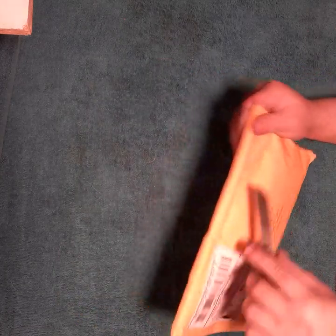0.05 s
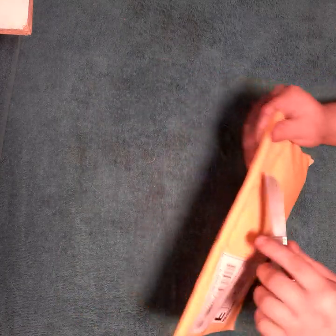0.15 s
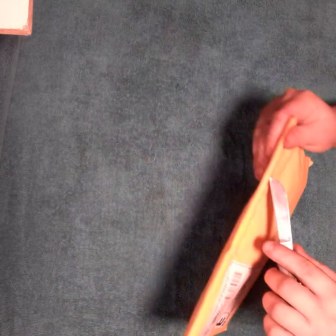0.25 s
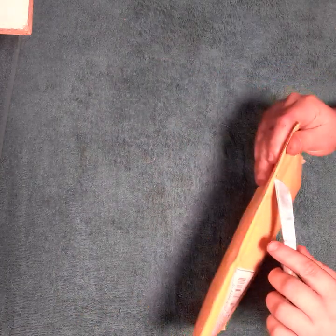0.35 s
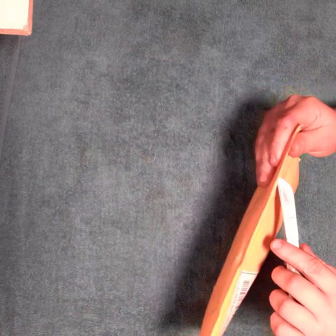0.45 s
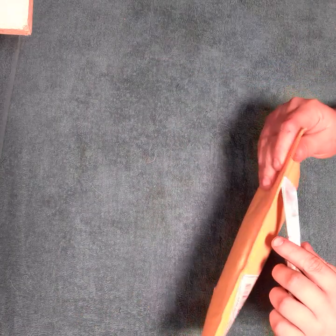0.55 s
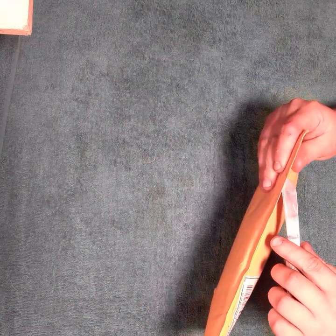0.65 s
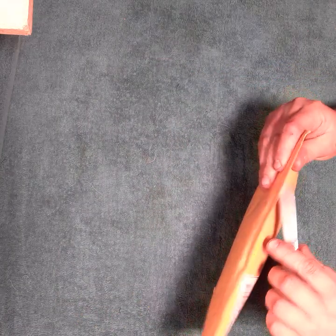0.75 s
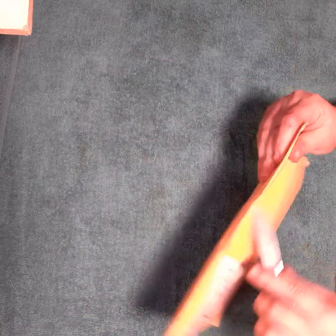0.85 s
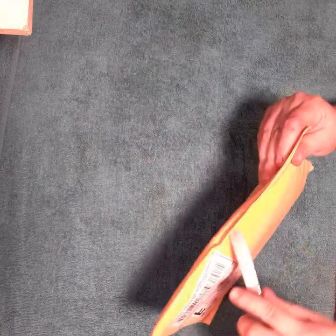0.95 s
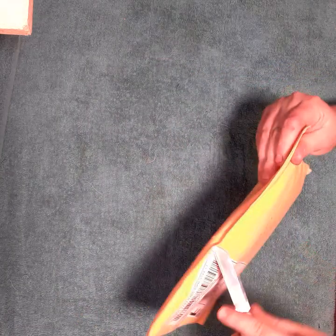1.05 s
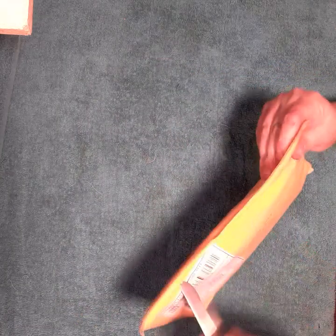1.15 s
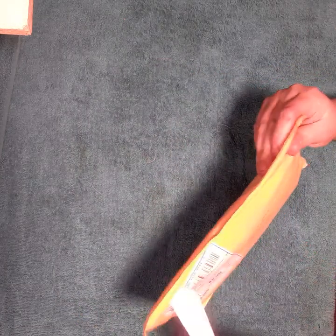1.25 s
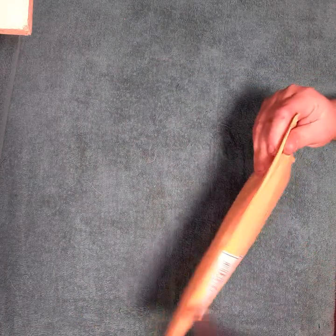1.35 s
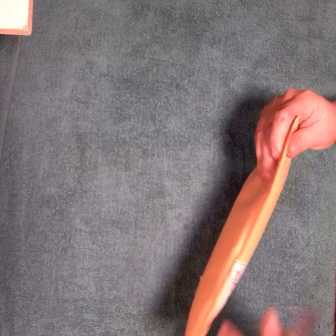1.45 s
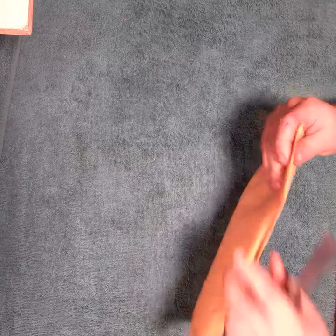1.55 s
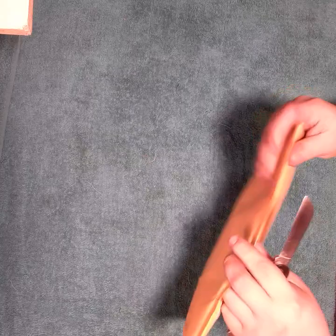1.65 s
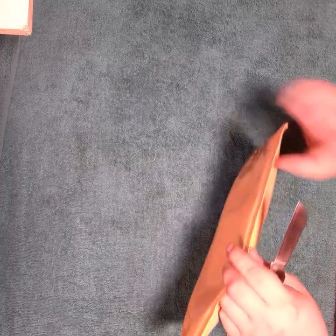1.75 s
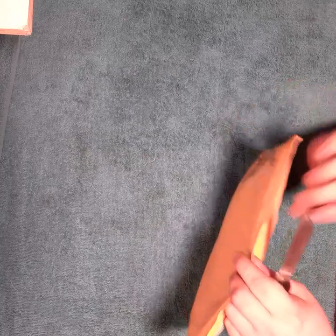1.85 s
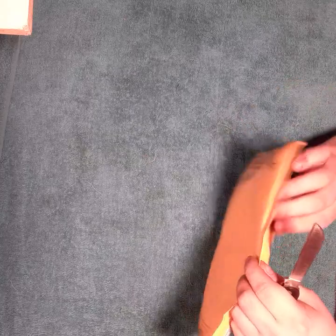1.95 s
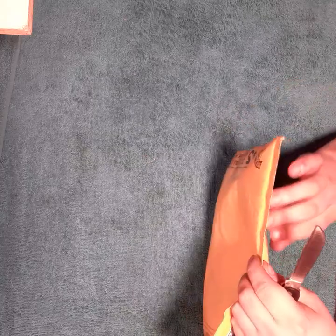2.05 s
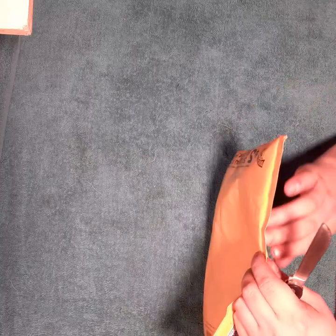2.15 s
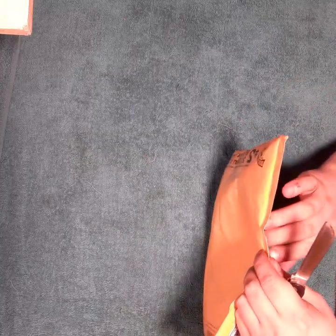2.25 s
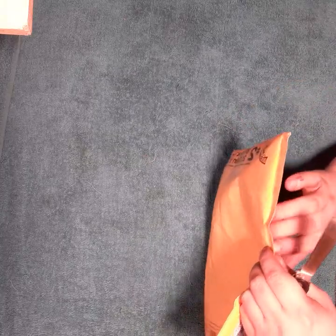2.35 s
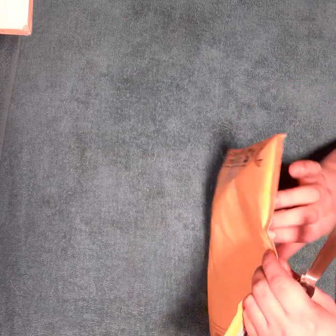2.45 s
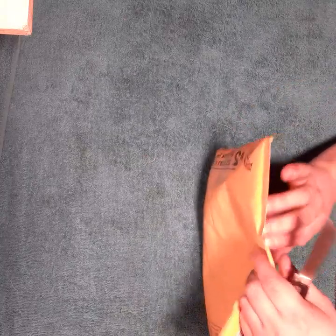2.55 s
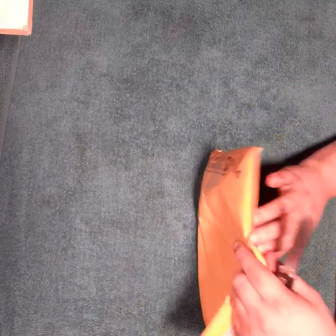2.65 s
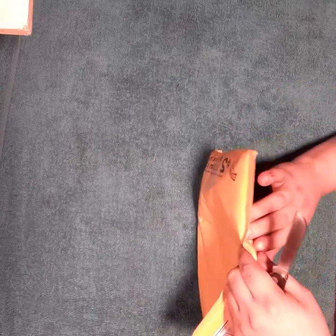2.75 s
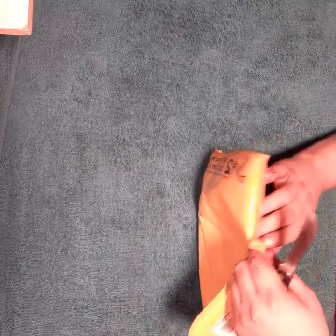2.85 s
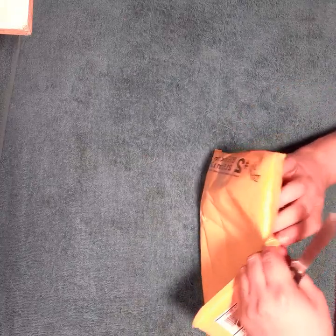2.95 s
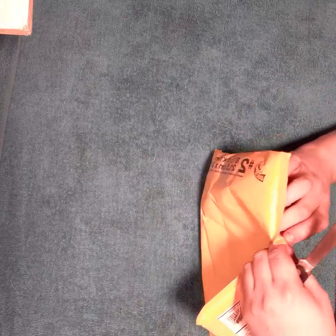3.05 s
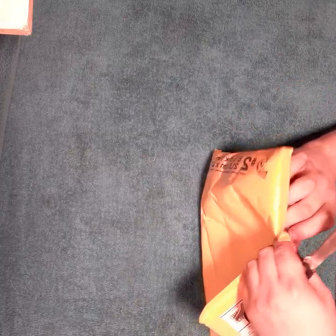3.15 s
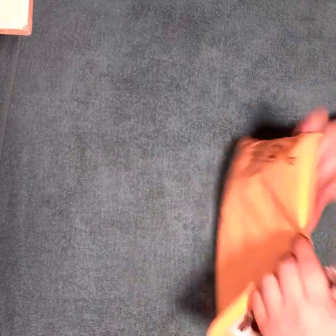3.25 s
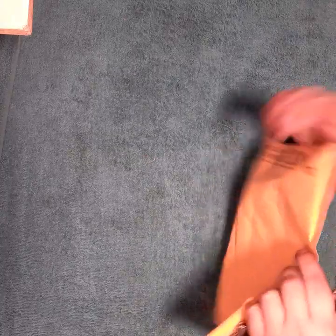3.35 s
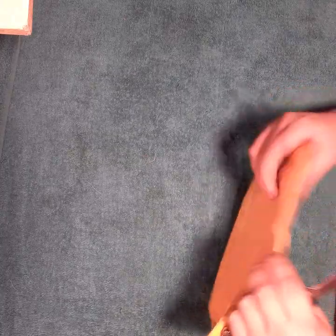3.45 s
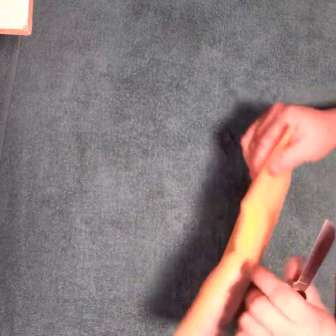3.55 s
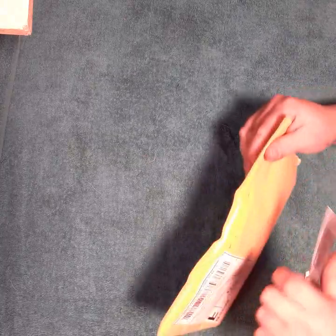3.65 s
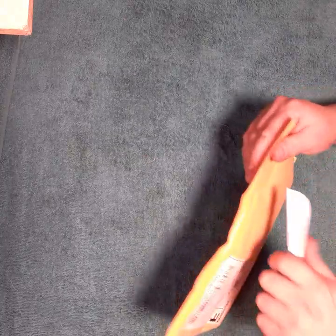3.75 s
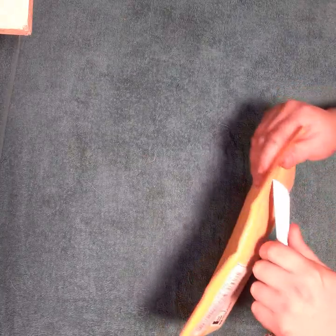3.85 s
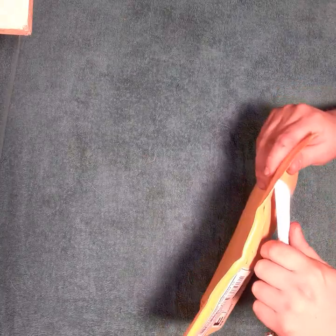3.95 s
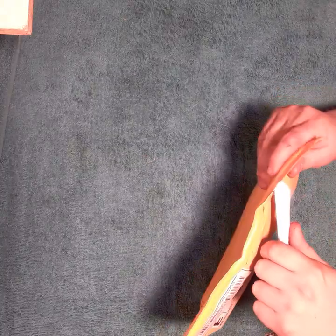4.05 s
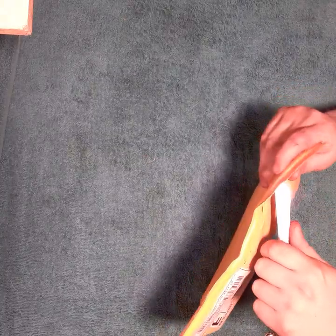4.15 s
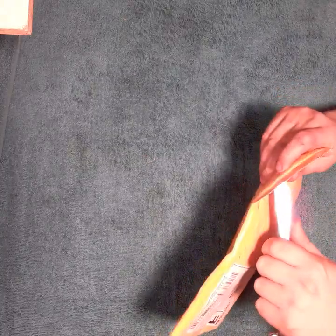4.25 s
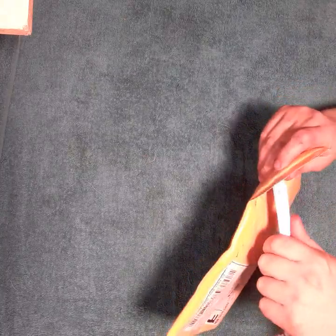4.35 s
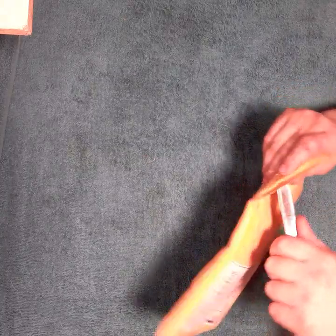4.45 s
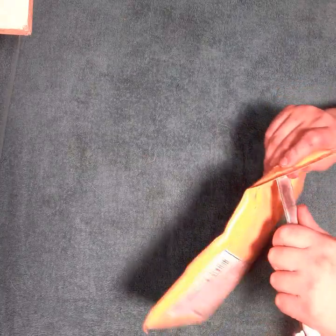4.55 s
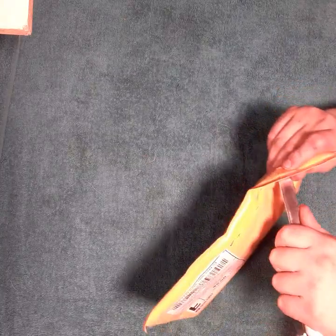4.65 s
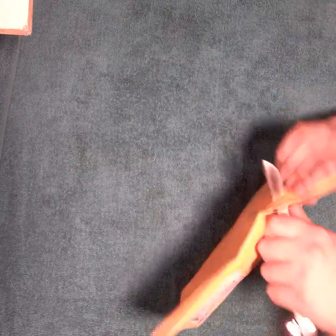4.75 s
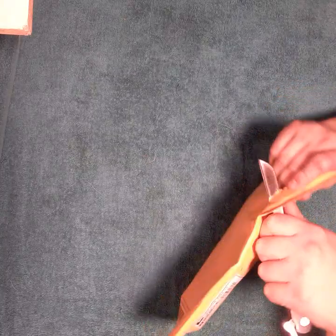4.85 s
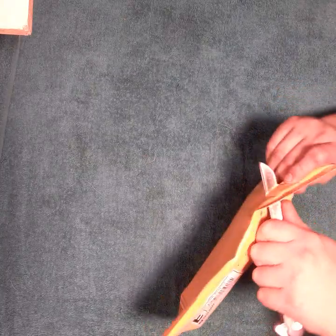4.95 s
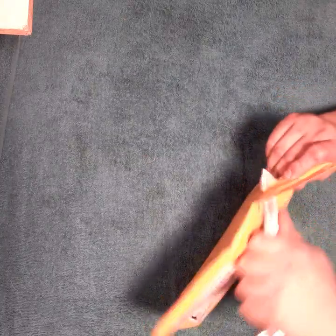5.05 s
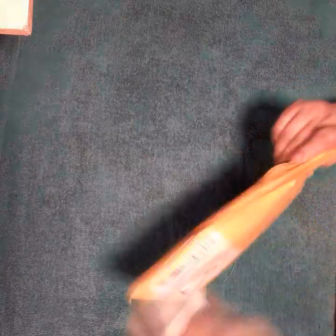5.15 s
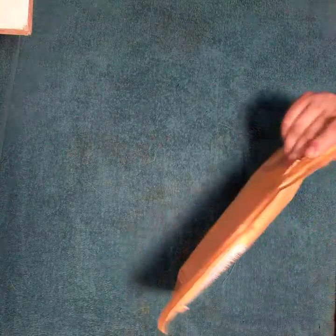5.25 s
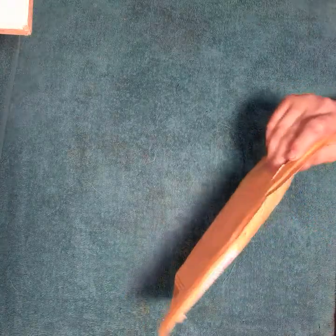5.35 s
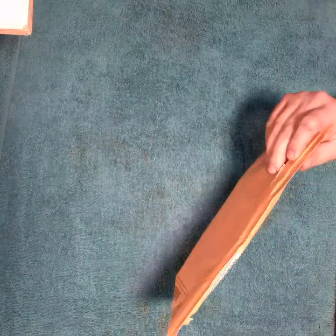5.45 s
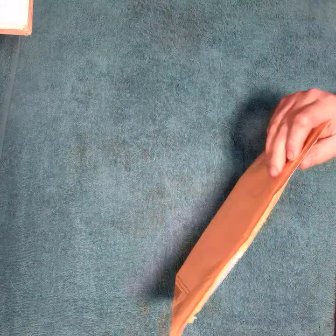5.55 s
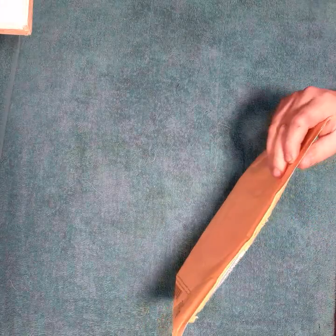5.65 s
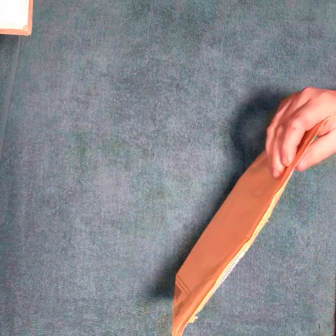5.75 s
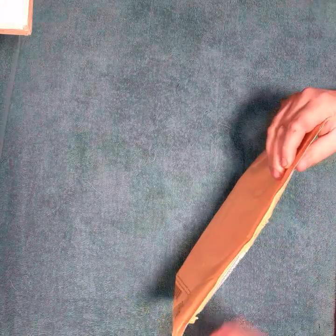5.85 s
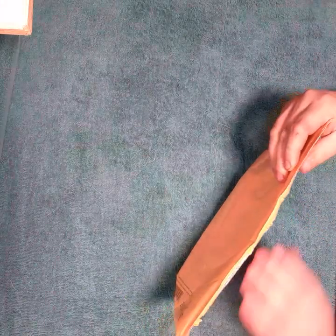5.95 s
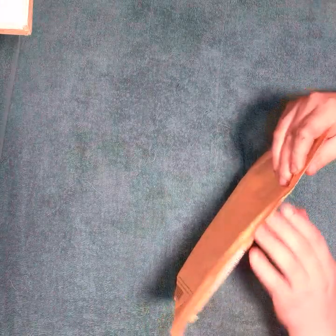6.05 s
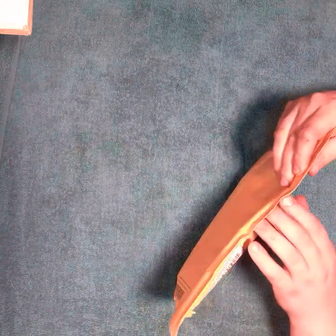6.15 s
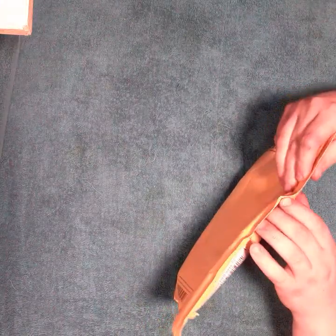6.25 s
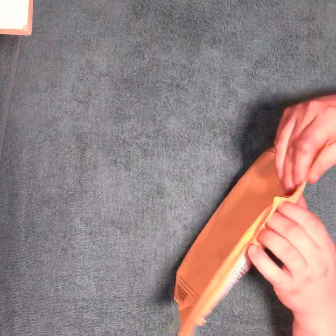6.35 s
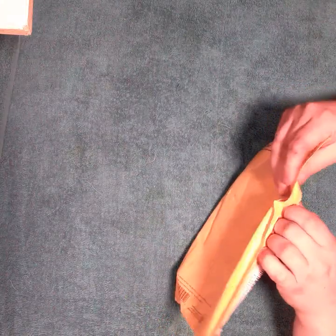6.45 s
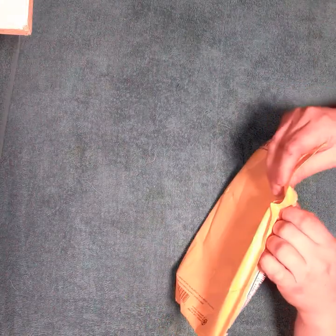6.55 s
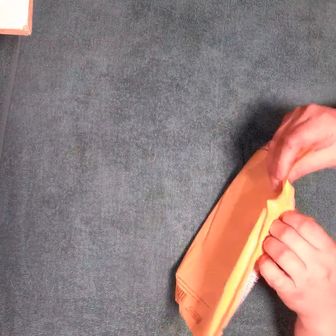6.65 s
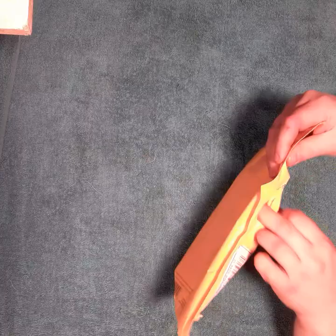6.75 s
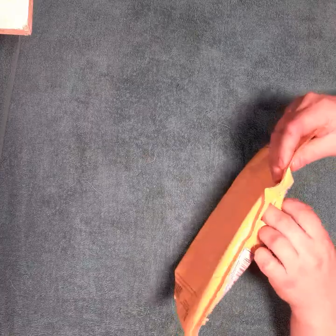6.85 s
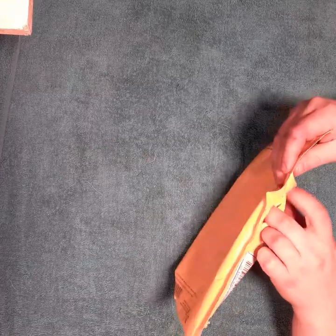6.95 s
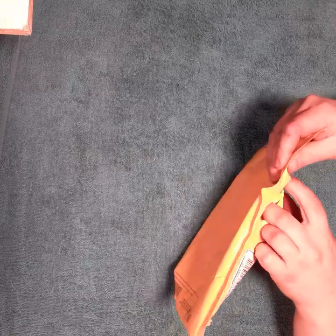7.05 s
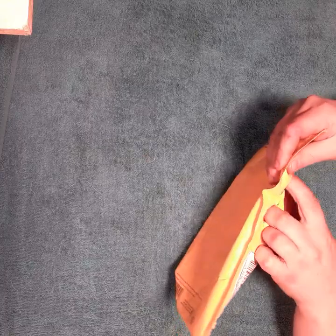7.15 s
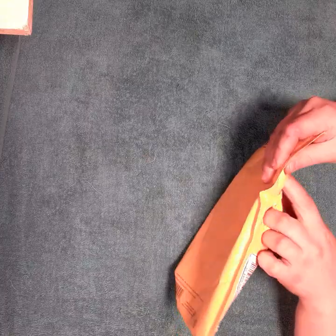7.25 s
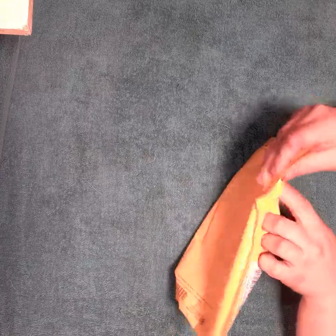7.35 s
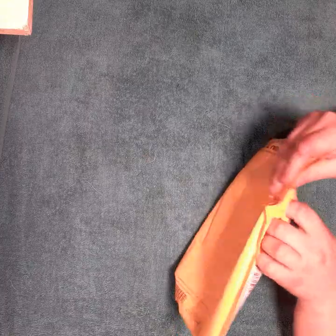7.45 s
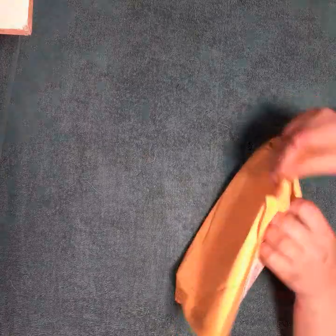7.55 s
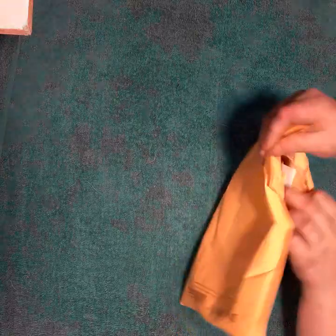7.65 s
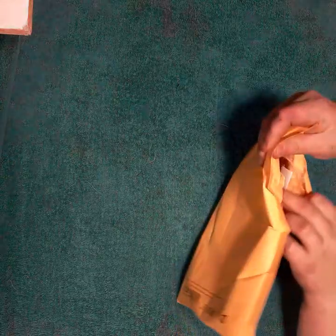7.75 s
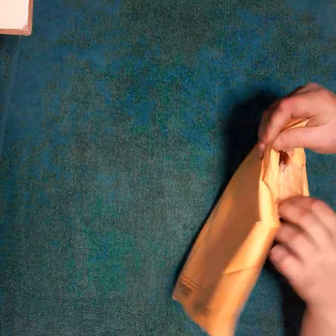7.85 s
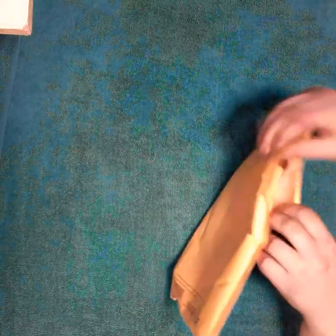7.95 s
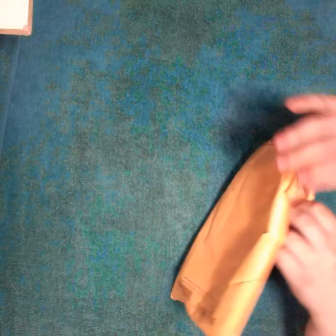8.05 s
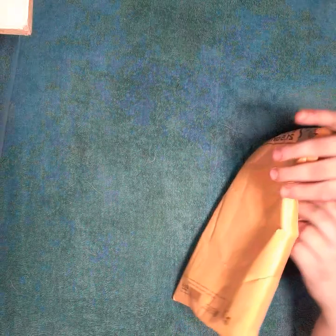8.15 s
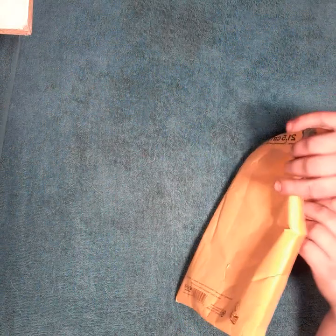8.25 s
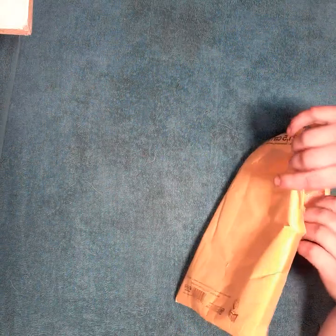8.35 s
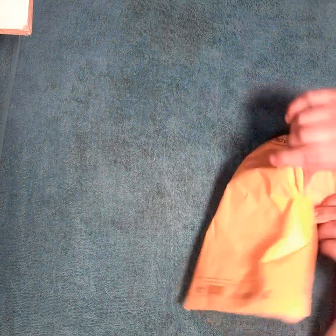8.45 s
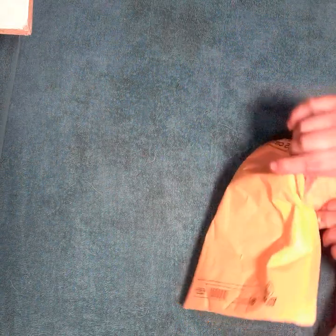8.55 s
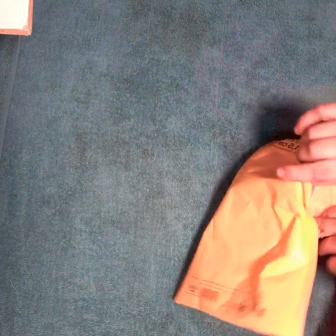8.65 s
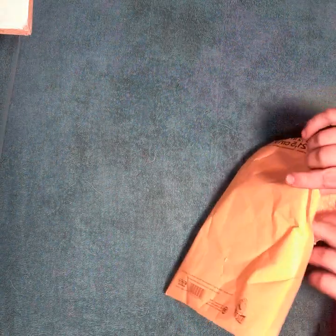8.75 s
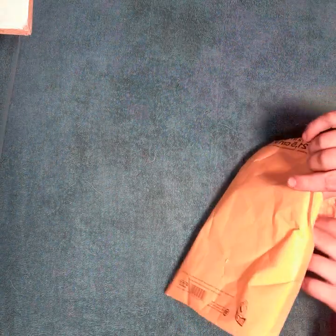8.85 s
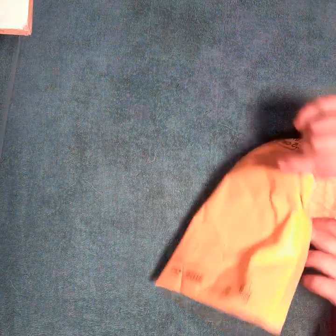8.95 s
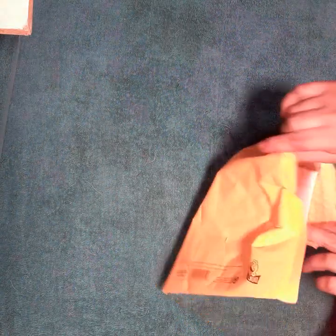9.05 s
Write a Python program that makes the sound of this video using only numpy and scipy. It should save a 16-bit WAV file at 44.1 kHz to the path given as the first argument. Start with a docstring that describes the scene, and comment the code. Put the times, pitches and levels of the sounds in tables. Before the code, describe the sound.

Close stereo sound of stiff paper over a table: hissing slides, fine crinkles, quick fibre tears and hollow wall pops, with low padded thumps. Cutting comes in two brief violent clusters, near one and five seconds, separated by gentle turning and quiet scraping. Later the paper is squeezed and spread with growing rustle and cracks. Small dry room, short reflections, faint steady background rush.

```python
"""Quiet room, camera close by: a padded paper mailer is turned in the hands, slit with a knife and pulled open.
Random snaps of fibres, filtered, make the slide, the crinkle and the short rips; cracks are decaying noise.
Buckling walls ring as damped sines, squeaks and soft bumps as driven resonances.
Table modes and brief random echoes answer; a faint steady rush lies underneath."""
import sys
import numpy as np
from scipy import signal
from scipy.fft import rfft, irfft, next_fast_len
from scipy.io import wavfile
from scipy.ndimage import map_coordinates

SR = 44100
rng = np.random.default_rng(int(sys.argv[2]) if len(sys.argv) > 2 else 0)


def waveform_to_disk(signal):
    """Save audio, clipped to [-1, 1], as 16-bit WAV at the path in sys.argv[1]."""
    frames = np.transpose(np.atleast_2d(signal))
    scaled = np.clip(frames, -1, 1) * 32767
    samples = np.round(scaled).astype(np.int16)
    wavfile.write(sys.argv[1], SR, samples)


N = 400869


def amp(db):
    """Amplitude factor of a level in dB."""
    return 10 ** (np.asarray(db) / 20)


def unit(x):
    """x scaled to rms 1."""
    return x / np.sqrt(np.mean(x ** 2) + 1e-20)


def along(points, hz):
    """Interpolate (Hz, value) points on a log frequency axis."""
    point_hz, value = np.transpose(points)
    return np.interp(np.log(hz + 1), np.log(point_hz + 1), value)


def wobble(knots_per_s):
    """Random curve, straight between normally distributed knots."""
    knots = rng.standard_normal(N // 20)
    return map_coordinates(knots, [np.arange(N) * knots_per_s / SR], order=1, mode="wrap")


def filtered(x, response):
    """x times a complex response of frequency."""
    size = x.shape[-1]
    padded = next_fast_len(size + SR // 8, True)
    spectrum = rfft(x, padded) * response(np.fft.rfftfreq(padded, 1 / SR))
    return irfft(spectrum, padded)[..., :size]


def coloured(x, spectrum, tilt_db_per_oct=0):
    """x through a causal minimum-phase filter with this spectrum, tilted."""
    hz = np.fft.rfftfreq(4096, 1 / SR)
    octaves = np.log2(np.maximum(hz, spectrum[1][0]) / SR)
    level_db = along(spectrum, hz) + tilt_db_per_oct * octaves
    cepstrum = irfft(np.log(amp(level_db)))
    # folding the cepstrum onto positive times makes the filter causal
    half = len(cepstrum) // 2
    cepstrum[1:half] *= 2
    cepstrum[half + 1:] = 0
    impulse = irfft(np.exp(rfft(cepstrum)))
    return signal.oaconvolve(x, impulse)[:len(x)]


def resonance(f, hz, width_hz):
    """Response of one damped mode, 1 at its centre."""
    return 1j * f * width_hz / (hz * hz - f * f + 1j * f * width_hz)


def add(track, start_s, sound):
    """Mix a sound into the track at start_s."""
    room_left = track[max(round(start_s * SR), 0):][:len(sound)]
    room_left += sound[:len(room_left)]


def snaps(size, rate_hz, spread_db):
    """Fibres let go at random moments with uneven strength and random sign; rms 1."""
    fires = rng.random(size) < rate_hz / SR
    strength = amp(spread_db * np.clip(rng.standard_normal(size), -2, 2))
    return unit(fires * strength * rng.choice([-1, 1], size))


# hand moves, relative levels: [height_s, rise_s, fall_s, slide_db, crinkle_db]
HAND_MOVES = [(.02, .1, .12, -51.5, -53.5), (.35, .15, 0.073, -54.5, -45), (.57, 0.077, .11, -56, -58),
              (.9, .09, .07, -36.5, -37.5), (1.04, 0.079, 0.057, -39.5, -33),
              (1.18, 0.056, 0.025, -41.5, -42), (1.28, 0.039, 0.092, -45, -44),
              (1.45, 0.038, 0.12, -57, -76), (1.69, 0.15, 0.18, -43, -48), (1.91, 0.14, 0.17, -43.5, -40),
              (2.17, 0.12, 0.12, -45, -55), (2.431, 0.082, 0.073, -43.5, -44),
              (2.62, 0.075, 0.054, -42.5, -41.5), (2.76, 0.15, .13, -41.5, -47),
              (2.94, 0.15, 0.15, -48, -44.5), (3.13, 0.14, 0.14, -50, -44.5), (3.32, 0.17, 0.098, -42, -41),
              (3.53, 0.16, 0.088, -41, -41.5), (3.73, 0.078, 0.042, -49.5, -48.5),
              (3.83, .06, .06, -58, -64), (3.94, 0.053, 0.049, -52, -44.5), (4.11, 0.099, .05, -51, -60),
              (4.24, 0.12, .1, -52.5, -56.5), (4.5, 0.032, .055, -45, -47),
              (4.61, 0.022, 0.045, -49.5, -51), (4.77, 0.056, 0.12, -45, -46),
              (5.11, 0.047, .05, -42.5, -49), (5.22, .05, 0.036, -42, -40), (5.4, 0.1, 0.13, -54.5, -50),
              (5.555, .025, 0.15, -58, -59), (6.08, 0.056, 0.06, -46.5, -56), (6.41, 0.13, 0.15, -42, -40),
              (6.62, .05, .06, -48, -54), (6.73, 0.092, .11, -39.5, -39.5),
              (6.96, 0.092, 0.29, -44.5, -46.5), (7.16, 0.057, 0.1, -50.5, -47),
              (7.41, 0.1, 0.13, -36, -40), (7.609, 0.081, 0.066, -34, -30), (7.95, 0.17, 0.12, -44, -43.5),
              (8.28, .16, 0.064, -42.5, -39.5), (8.449, 0.083, 0.063, -32.5, -33),
              (8.75, 0.11, 0.1, -45, -45), (9.04, 0.11, 0.13, -34.5, -38)]
SWELL_DB, SWELL_SHAPE = 9.5, 1.39  # drop after one rise or fall time; roundness of the top
HOLD_DB = -67  # relative floor of slide and crinkle between moves
FLEX_DB, FLEX_DB_PER_DB = -55, 1.09  # relative flex in an average move; growth with effort


def effort():
    """Relative dB curves: overlapping moves add in power, and flex follows both slide and crinkle."""
    t = np.arange(0, N, 64) / SR
    height_s, rise_s, fall_s, slide_db, crinkle_db = np.transpose(HAND_MOVES)[:, :, None]
    distance = np.abs(np.maximum((height_s - t) / rise_s, (t - height_s) / fall_s))
    swell_db = -SWELL_DB * distance ** SWELL_SHAPE

    def total_db(move_db):
        """Power sum of all moves and the holding floor."""
        moves = np.linalg.norm(amp(move_db + swell_db), axis=0)
        return 20 * np.log10(np.hypot(moves, amp(HOLD_DB)))

    slide, crinkle = total_db(slide_db), total_db(crinkle_db)
    above_average_db = (slide - slide_db.mean() + crinkle - crinkle_db.mean()) / 2
    flex = FLEX_DB + FLEX_DB_PER_DB * above_average_db
    return [np.interp(np.arange(N) / SR, t, level) for level in (slide, crinkle, flex)]


# relative spectrum of sliding paper: [freq_hz, density_db]
SLIDE_SPECTRUM = [(300, -33), (1000, -10.5), (2500, -1.5), (4400, 1), (6800, -5), (9000, -1), (12000, -2.5),
                  (16000, -9.5)]
# relative spectrum of small creases: [freq_hz, density_db]
CRINKLE_SPECTRUM = [(150, -26.5), (400, -5.5), (700, -5.5), (1200, -2), (2400, -1), (4000, -4),
                    (6500, -6.5), (16000, -37)]
# relative spectrum of the flexing bag: [freq_hz, density_db]
FLEX_SPECTRUM = [(25, -10.5), (60, -12), (120, 1.5), (220, -2.5), (450, -2.5), (900, -7.5), (3000, -45.5)]
# relative spectrum of breaking fibres: [freq_hz, density_db]
TEAR_SPECTRUM = [(80, -14.5), (300, -10), (600, -6.5), (1200, -1.5), (2600, 2), (4500, -1), (6800, -8.5),
                 (9000, -4.5), (12500, -5), (16000, -14.5)]


def handling(tick_db=-11, tick_life_s=0.0012):
    """Sliding paper hisses and ticks, creases crinkle in clumps and the whole bag flexes."""
    slide_db, crinkle_db, flex_db = effort()
    grip_db = wobble(70)  # the paper catches and slips
    slide_snaps = snaps(N, rate_hz=14000, spread_db=3.5) * amp(grip_db + 1.3 * wobble(300))
    slide = coloured(slide_snaps, SLIDE_SPECTRUM)
    # single creases give way, each with about a millisecond of crackle
    t = np.arange(SR // 100) / SR
    gives = np.abs(snaps(N, rate_hz=35, spread_db=4.0))
    crackle = signal.oaconvolve(gives, np.exp(-t / tick_life_s))[:N]
    ticks = coloured(crackle * rng.standard_normal(N), TEAR_SPECTRUM, tilt_db_per_oct=3.0)
    crease_snaps = snaps(N, rate_hz=2200, spread_db=2) * amp(2.3 * grip_db + 3.0 * wobble(220))
    crinkle = coloured(crease_snaps, CRINKLE_SPECTRUM)
    flex = coloured(snaps(N, rate_hz=900, spread_db=1) * amp(wobble(25)), FLEX_SPECTRUM)
    surface = amp(slide_db + 5.5) * (unit(slide) + amp(tick_db) * unit(ticks))
    return surface + amp(crinkle_db - 0.97) * unit(crinkle) + amp(flex_db - 3.0) * unit(flex)


# tearing or scraping strokes, relative levels: [start_s, length_s, level_db, bright_db_per_oct, push_db]
RIP_STROKES = [(0.842, 0.019, -29, 0.5, -6), (.895, 0.018, -24.5, -.5, -3.5), (1.003, 0.027, -26.5, -1, 1),
               (1.052, 0.0099, -24, 1, 3), (1.125, .037, -21.5, -3.5, -8), (1.137, 0.018, -14.5, -1, -11),
               (1.648, 0.021, -30.5, -1, -19), (2.16, 0.033, -33, 0.5, -17),
               (3.18, 0.0046, -25.5, 1.5, 2.5), (3.46, 0.016, -27, 5, -5.5), (3.544, 0.0036, -26, 1.5, 2.5),
               (4.694, 0.067, -28, 2.5, -10.5), (4.78, 0.0089, -24, 2.5, -7.5),
               (5.089, 0.06, -27, 2.5, -14), (5.12, .014, -22.5, 1, -5), (5.134, 0.037, -13.5, 0.1, -7.5),
               (5.179, .016, -11.5, -.5, -11.5), (5.527, 0.03, -45, -4.5, -4),
               (7.38, 0.021, -28.5, -0.5, -9), (7.582, 0.061, -25, 1, -7), (8.426, 0.0065, -21.5, 2, -2),
               (8.434, 0.011, -22.5, -3.5, 1), (8.494, 0.0093, -29, 6, 7.5),
               (8.995, 0.019, -16.5, -1, -9.5), (9.041, 0.0055, -22, 0, -19)]


def rips(rise_s=0.0017, release_s=0.0098, jerk_db=1.44, buckle_db=-6):
    """Each stroke breaks fibres in jerky bunches, buckles the cut edge and tugs at the bag, then lets go."""
    tears, tugs = np.zeros(N), np.zeros(N)
    t = np.arange(SR // 5) / SR
    for start_s, length_s, level_db, bright_db_per_oct, push_db in RIP_STROKES:
        let_go = np.exp(-np.maximum(t - length_s, 0) / release_s)
        pull = amp(level_db - 2.5) * (1 - np.exp(-t / rise_s)) * let_go
        fibre_snaps = snaps(len(t), rate_hz=5000, spread_db=1.5)
        fibres = unit(coloured(fibre_snaps, TEAR_SPECTRUM, bright_db_per_oct))
        edge_snaps = snaps(len(t), rate_hz=350, spread_db=2)
        edge = unit(coloured(edge_snaps, CRINKLE_SPECTRUM, bright_db_per_oct))
        tug = unit(coloured(rng.standard_normal(len(t)), FLEX_SPECTRUM))
        add(tears, start_s, pull * (fibres + amp(buckle_db) * edge))
        add(tugs, start_s, pull * amp(push_db - 4.5) * tug)
    return tears * amp(jerk_db * wobble(260)) + tugs


# taut paper parting at once, relative levels: [start_s, level_db, bright_db_per_oct]
PAPER_CRACKS = [(.929, -14.5, -1.5), (1.426, -35, 4), (2.402, -19, 2.5), (2.787, -30, 4),
                (3.203, -20, -0.5), (3.468, -23, 7), (4.6971, -16, 5.5), (6.655, -24.5, -1),
                (6.7077, -22, -2), (8.412, -16.5, -0.5), (8.4251, -19.5, 3.5), (8.5, -20, -0.5),
                (9.0428, -27.5, 1.5)]


def cracks(life_s=0.006, jolt=4):
    """One hard jolt, then a few milliseconds of fibres giving way behind it."""
    out, t = np.zeros(N), np.arange(SR // 20) / SR
    for start_s, level_db, bright_db_per_oct in PAPER_CRACKS:
        burst = rng.standard_normal(len(t)) * np.exp(-t / life_s)
        burst[0] += jolt
        crack = unit(coloured(burst, TEAR_SPECTRUM, bright_db_per_oct))
        add(out, start_s, amp(level_db - 13.5) * crack)
    return out


# buckles of the stiff wall, relative levels: [start_s, level_db, pitch_hz, crack_db]
WALL_POPS = [(0.7042, -36, 1260, -24), (0.8759, -17.5, 1120, -6), (.909, -22, 1300, -8),
             (.977, -19, 1180, 0), (1.01, -14.5, 2070, 0), (1.058, -20, 1120, 2), (1.3, -27, 1300, -16),
             (1.656, -26.5, 1170, -17), (1.685, -26, 1200, -14), (1.804, -26.5, 2050, -16),
             (1.927, -25.5, 990, -15), (2.002, -16.5, 1750, -28), (2.0325, -19, 1960, -20.5),
             (2.885, -23, 1470, -21), (2.924, -32.5, 937, -18), (3.181, -16.5, 1400, 1),
             (3.233, -26, 1110, -19), (3.549, -23.5, 760, -12), (3.728, -32.5, 830, -16),
             (3.741, -36.5, 860, -5), (3.965, -37, 2000, -14), (4.3115, -40, 1320, -18),
             (4.495, -32, 834, -3), (4.54, -34, 1130, -16), (4.782, -27, 1110, -4.5),
             (4.809, -24, 1420, -21), (4.877, -28.5, 1150, -15), (5.526, -33.5, 1710, -28),
             (6.371, -34, 1400, -12), (6.395, -22.5, 2160, -13), (6.532, -36, 1000, -16),
             (6.553, -35, 2900, -14), (6.654, -27, 1090, -17), (6.706, -18, 1270, -18),
             (6.708, -16.5, 2400, -18), (6.775, -27, 1100, -14), (6.925, -23.5, 1450, -6),
             (7.891, -26, 2090, -9), (7.983, -25.5, 2020, -22), (8.425, -10, 1200, -8),
             (8.443, -15, 1400, -12), (8.5, -20, 1210, -1), (9.004, -9, 2140, -5), (9.007, -9, 2200, 8)]
CHATTER_DB = -8.5  # smaller creases, relative to the ring


def pops(decay_cycles=0.99, overtone=1.13, chatter_life_s=0.0076, crack_life_s=.0012):
    """A buckle starts with a crack, rings with a decay of about one cycle and sets smaller creases chattering."""
    out, t = np.zeros(N), np.arange(SR // 12) / SR
    for start_s, level_db, pitch_hz, crack_db in WALL_POPS:
        ring = np.sin(2 * np.pi * pitch_hz * t) * np.exp(-t * pitch_hz / decay_cycles)
        noise = rng.standard_normal(len(t))
        creases = unit(filtered(noise, lambda f: resonance(f, overtone * pitch_hz, 2.4 * pitch_hz) ** 3))
        chatter = amp(CHATTER_DB) * creases * np.exp(-t / chatter_life_s)
        # differenced noise is bright
        crack = np.diff(rng.standard_normal(len(t) + 1)) * np.exp(-t / crack_life_s)
        pop = ring + chatter + amp(crack_db - 7) * crack
        add(out, start_s + .0008, amp(level_db + 1.5) * pop)
    return out


# stick-slip of blade or fingers, relative levels: [start_s, length_s, pitch_hz, level_db]
PAPER_SQUEAKS = [(1.256, 0.03, 2100, -38), (1.297, .02, 2400, -27.5), (1.559, 0.028, 2000, -36.5),
                 (2.158, 0.032, 2820, -34.5), (3.929, 0.04, 2000, -50), (7.654, 0.011, 2420, -27)]


def squeaks(relative_width=0.48):
    """Uneven slips drive one resonance of the taut paper."""
    out = np.zeros(N)
    for start_s, length_s, pitch_hz, level_db in PAPER_SQUEAKS:
        size = round(length_s * SR)
        slips = snaps(size, rate_hz=1500, spread_db=3.5)
        tone = filtered(slips, lambda f: resonance(f, pitch_hz, relative_width * pitch_hz) ** 2)
        add(out, start_s, amp(level_db) * unit(tone) * np.sqrt(np.hanning(size)))
    return out


# soft bumps on the padded bag, relative levels: [peak_s, level_db, push_hz]
BAG_BUMPS = [(.078, -39, 62), (.115, -40, 62.3), (.524, -46, 260), (.55, -45, 120), (0.866, -25, 211),
             (.948, -30, 129), (1.028, -19.5, 220), (1.08, -31, 130), (1.17, -27, 180), (1.275, -34, 130),
             (1.3, -32.5, 214), (1.889, -34, 164), (3.189, -31, 355), (3.299, -34, 115),
             (3.335, -26.5, 131), (3.36, -38, 65), (3.549, -24, 357), (3.589, -39, 390),
             (4.222, -39.5, 200), (5.189, -18.5, 360), (5.359, -39, 350), (5.53, -41, 450),
             (5.55, -45, 160), (5.746, -40, 105), (5.772, -37.5, 62), (6.714, -27, 135),
             (7.417, -28.5, 118), (7.609, -32.5, 132), (8.447, -33, 100), (8.509, -32, 202),
             (8.579, -42, 59), (8.726, -37.5, 125), (9.032, -32, 122)]


def bumps(rise_s=0.0033, life_s=0.02, padding_hz=520):
    """Padding turns a knock into a dull shudder; the deeper it is, the longer it lasts."""
    out, t = np.zeros(N), np.arange(SR // 4) / SR
    padding = signal.butter(N=3, Wn=padding_hz, fs=SR, output="sos")
    for peak_s, level_db, push_hz in BAG_BUMPS:
        slow = np.sqrt(150 / push_hz)  # stretches rise and life, 1 at 150 Hz
        swell = (1 - np.exp(-t / (rise_s * slow))) * np.exp(-t / (life_s * slow))
        knock = rng.standard_normal(len(t)) * swell
        shudder = filtered(knock, lambda f: resonance(f, push_hz, 1.23 * push_hz) ** 2)
        dull = unit(signal.sosfilt(padding, shudder))
        # the bag starts to move about a cycle before its peak
        add(out, peak_s - 0.807 / push_hz, amp(level_db - 21.5) * dull)
    return out


# standing waves of the table and its corner: [freq_hz, width_hz, over_direct_db]
CORNER_MODES = [(67, 7.7, 8), (125.3, 10.7, 3), (211, 18.4, 3), (357.4, 36, -0.5), (594, 94, 2.5),
                (960, 79, 0.5), (1117, 80, 1), (1380, 53, -8), (1810, 180, -7), (2127, 49, -5.5)]


def corner(x):
    """Damped modes of the table and its corner ring along with the direct sound."""
    def response(f):
        """Direct sound plus every mode."""
        return 1 + sum(amp(db) * resonance(f, hz, width_hz) for hz, width_hz, db in CORNER_MODES)
    return filtered(x, response)


# side gain of the sheet's spread: [freq_hz, gain_db]
SHEET_SPREAD = [(100, -24), (500, -6), (1200, -2.5), (2500, -6.5), (5000, -1.5), (9000, -1.5), (15000, -1)]


def sheet_spread(x):
    """Fibres all over the sheet sound at once: a side signal, weak in the bass."""
    return filtered(x, lambda hz: amp(along(SHEET_SPREAD, hz)))


# reverberation time of the walls: [freq_hz, t60_s]
WALL_DECAY = [(100, 0.38), (500, 0.23), (2000, 0.19), (12000, 0.16)]


def reflections(near_db, near_life_s, tail_db, scatter_hz=1300):
    """Mid and side echoes: short waves scatter quickly off hands and table, then the walls answer."""
    noise = rng.standard_normal((2, SR // 4))
    hz, frame_s, frames = signal.stft(noise, SR, nperseg=256)
    decay = amp(-60 * frame_s / along(WALL_DECAY, hz)[:, None])
    tail = signal.istft(frames * decay, SR, nperseg=256)[1]
    t = np.arange(tail.shape[1]) / SR
    near = rng.standard_normal(tail.shape) * np.exp(-t / near_life_s)
    near = filtered(near, lambda f: 1j * f / (1j * f + scatter_hz))
    tail = tail * (1 - np.exp(-t / 0.0022))
    return (amp(near_db) * unit(near) + amp(tail_db) * unit(tail)) / np.sqrt(len(t))


# side gain of the echoes: [freq_hz, gain_db]
ECHO_WIDTH = [(100, -11.5), (400, -7), (1000, 2), (2500, 0.5), (9000, 1)]


def room(x):
    """Mid and side echoes, redrawn every 1/8 s and crossfaded."""
    wet, hop = np.zeros((2, N)), SR // 8
    padded = np.pad(x, (hop, 2 * hop))
    fade = np.sqrt(np.hanning(2 * hop))
    for start in range(-hop, N, hop):
        piece = padded[start + hop:][:2 * hop] * fade
        impulses = reflections(near_db=-10, near_life_s=0.0075, tail_db=-11.5)
        echoes = signal.fftconvolve(piece[None], impulses, axes=1)
        for channel, echo in zip(wet, echoes):
            add(channel, start / SR, echo[max(-start, 0):])
    return wet[0], filtered(wet[1], lambda hz: amp(along(ECHO_WIDTH, hz)))


# relative spectrum of the quiet room: [freq_hz, density_db]
QUIET_SPECTRUM = [(25, 1.5), (65, -3), (130, -9), (280, -11.5), (500, -9.5), (1400, -28), (2100, -6.5),
                  (3500, -14), (7000, -28.5), (16000, -26.5)]


def background():
    """Faint, steady rush of the room: separate noise left and right over a weaker shared one."""
    shared, left, right = [unit(coloured(rng.standard_normal(N), QUIET_SPECTRUM)) for _ in range(3)]
    return amp(-74.0) * shared + amp(-65.5) * np.array([left, right])


def scene():
    """The mailer over the table, heard by two close microphones."""
    paper = corner(handling() + rips() + cracks() + squeaks() + pops() + bumps())
    echo_mid, echo_side = room(paper)
    # a second random draw of the paper gives each microphone its own treble
    spread = sheet_spread(handling() + rips() + cracks())
    mid = amp(-3.0) * (paper + echo_mid)
    side = amp(-2.0) * (spread + echo_side)
    # left over right gain: (freq_hz, gain_db)
    lean = [(100, 5.0), (450, 0.5), (1200, 1.0), (5000, 1.2), (13000, 0.0)]
    left = filtered(mid + side, lambda hz: amp(along(lean, hz) / 2))
    right = filtered(mid - side, lambda hz: amp(-along(lean, hz) / 2))
    return np.array([left, right]) + background()


def record(dry, low_cut_hz=42, top_hz=16000, ceiling=0.62):
    """The camera sheds the deepest bass, rounds the tallest peaks and keeps nothing above its band limit."""
    high_pass = signal.butter(N=3, Wn=low_cut_hz, btype="high", fs=SR, output="sos")
    thin = signal.sosfilt(high_pass, dry)
    rounded = thin / (1 + (thin / ceiling) ** 4) ** (1 / 4)
    return filtered(rounded, lambda hz: hz < top_hz)


dry = scene()
out = record(dry)
waveform_to_disk(out)
```